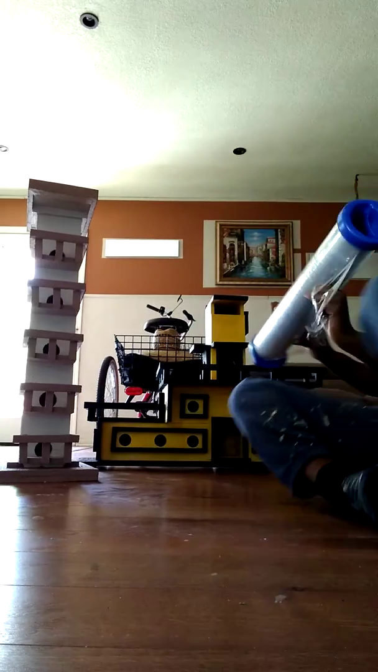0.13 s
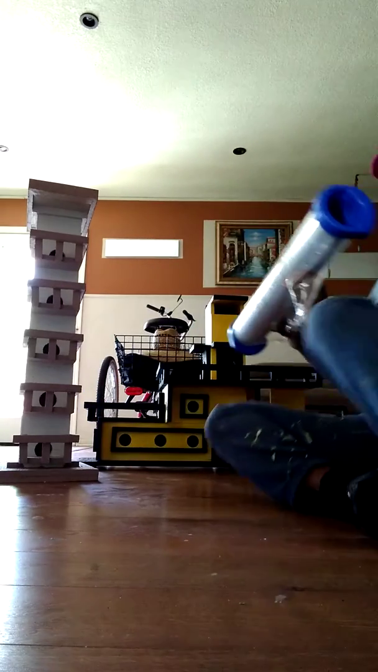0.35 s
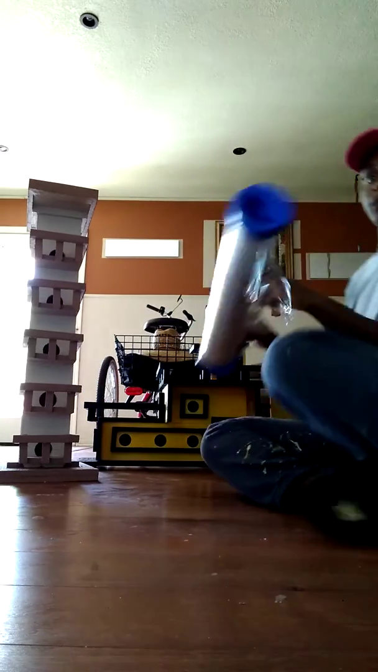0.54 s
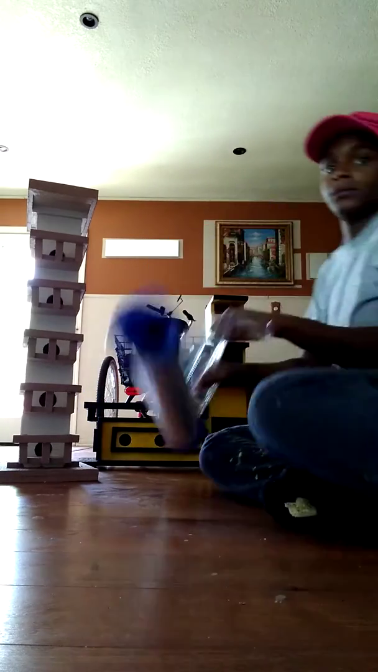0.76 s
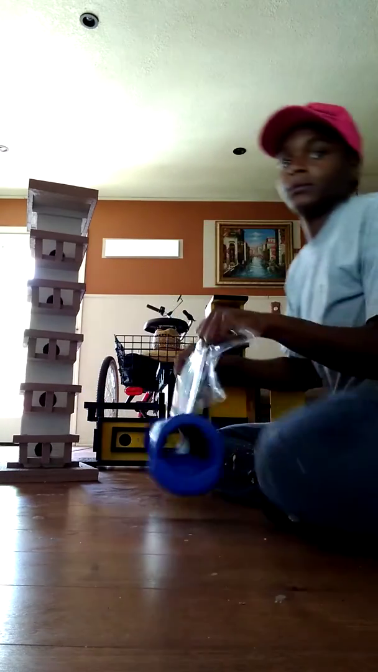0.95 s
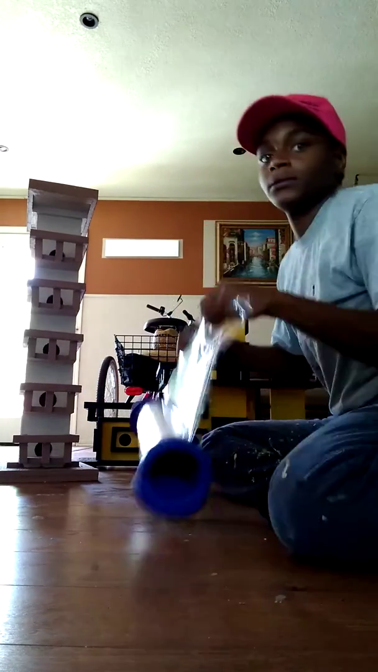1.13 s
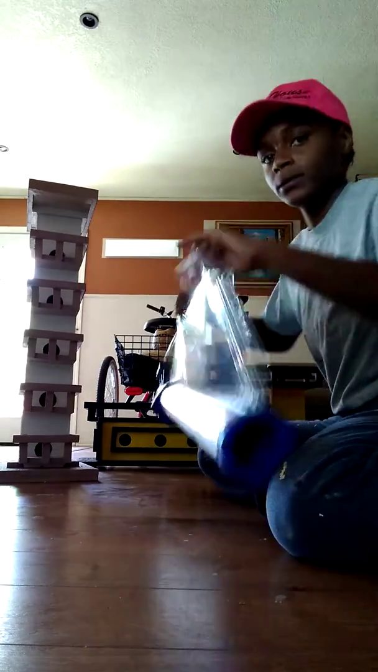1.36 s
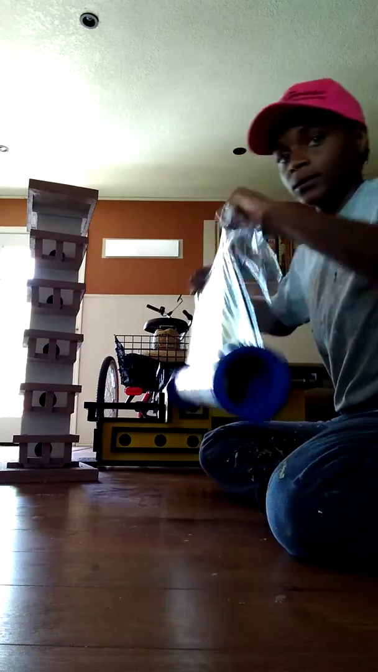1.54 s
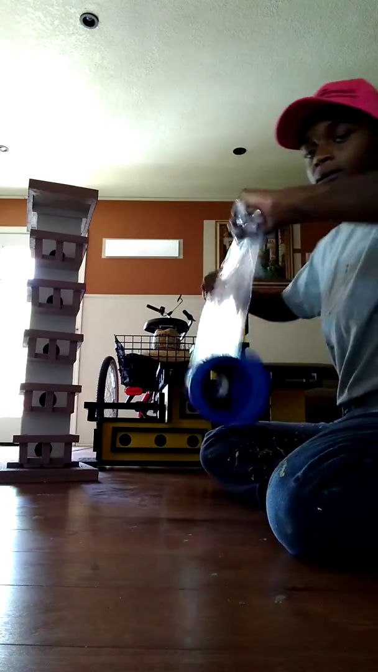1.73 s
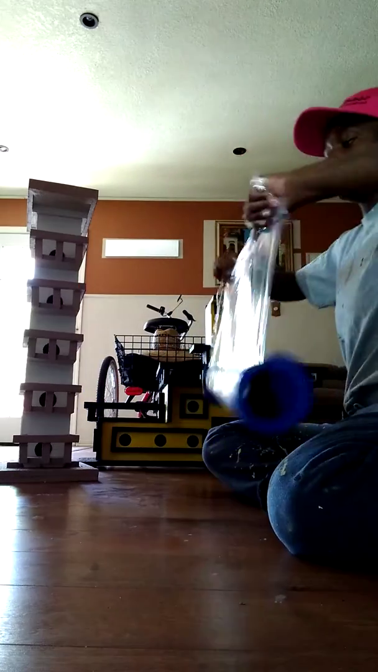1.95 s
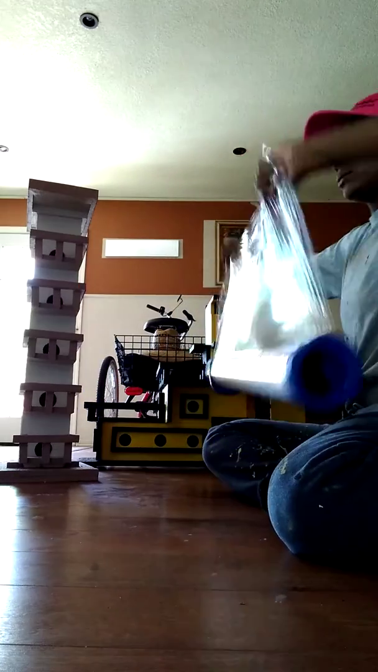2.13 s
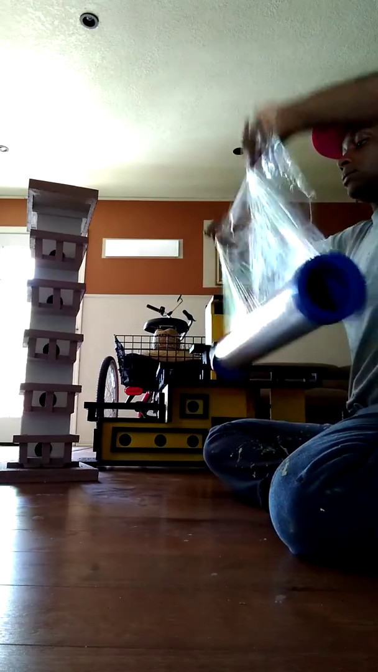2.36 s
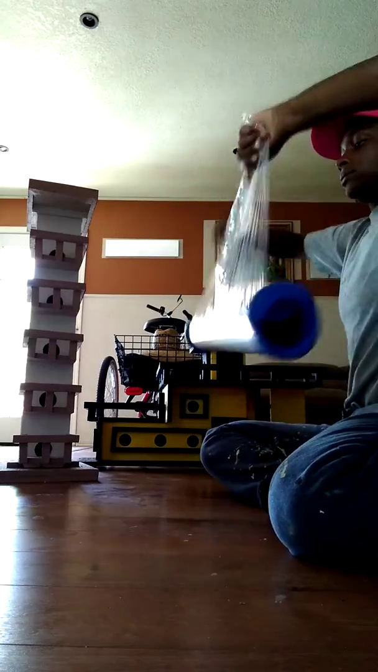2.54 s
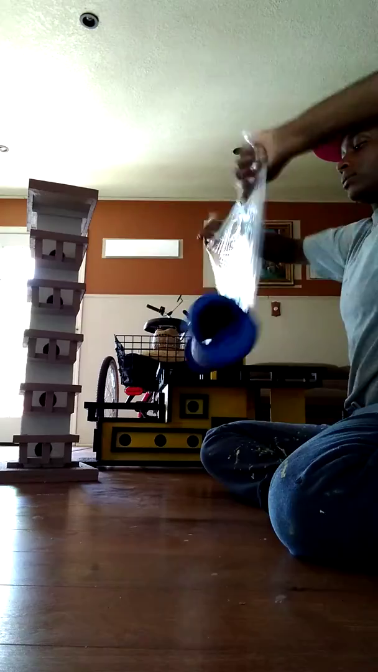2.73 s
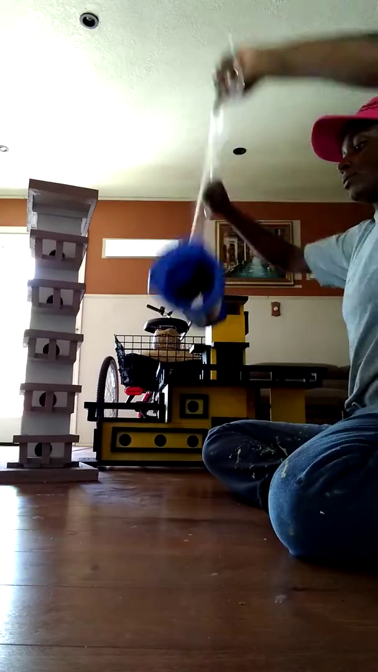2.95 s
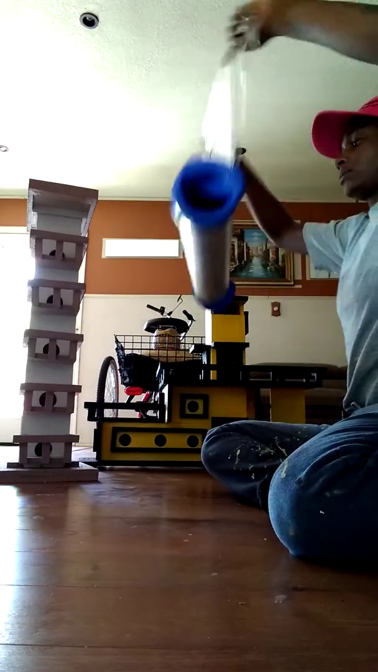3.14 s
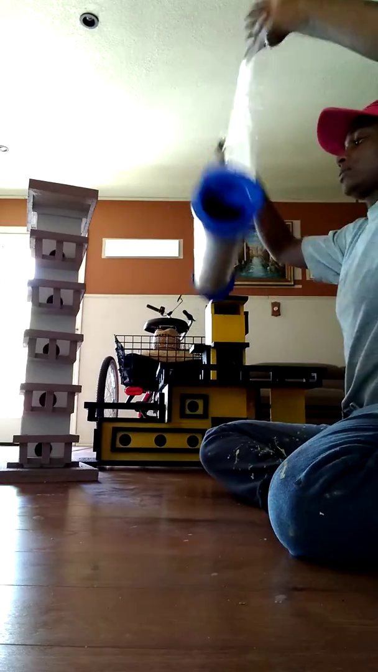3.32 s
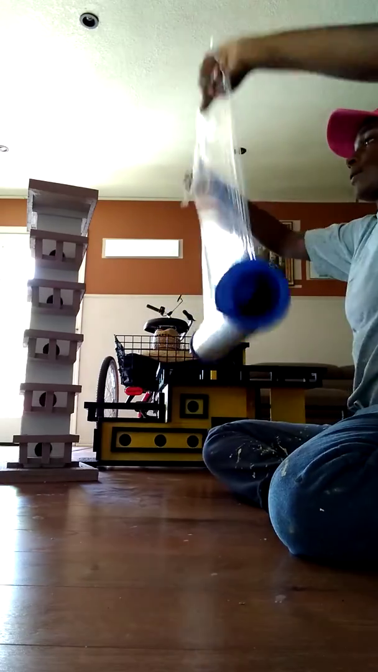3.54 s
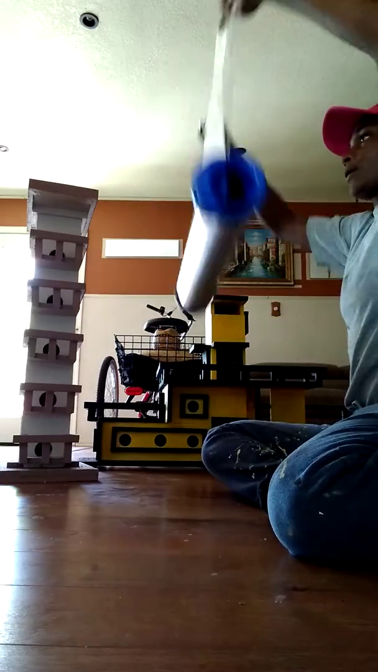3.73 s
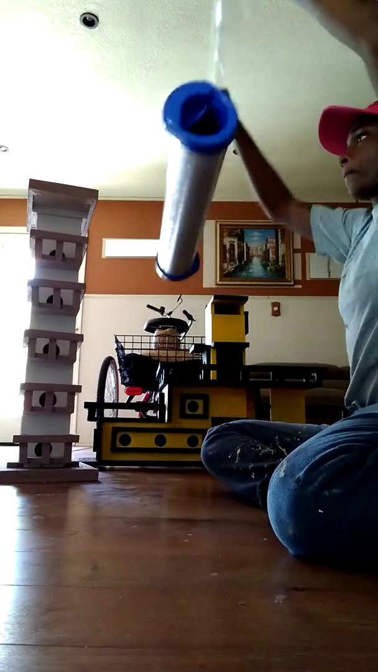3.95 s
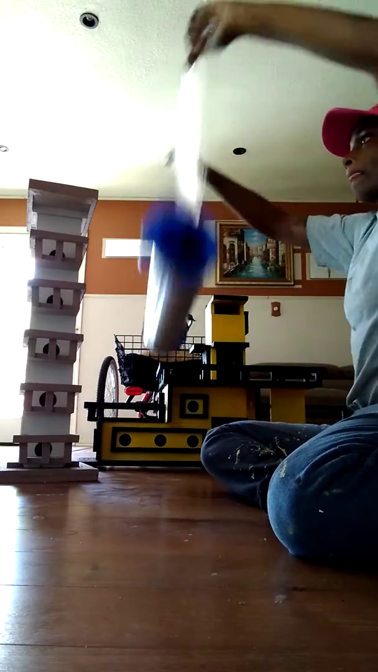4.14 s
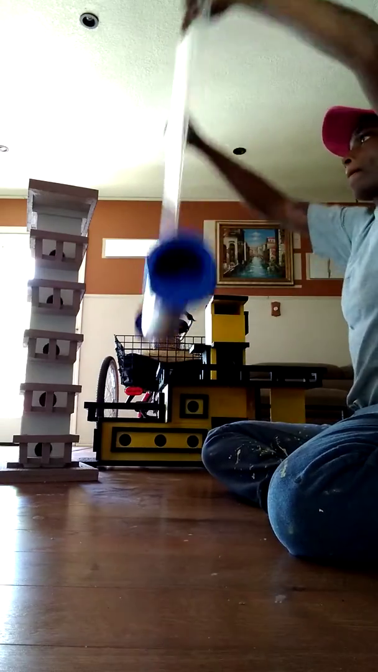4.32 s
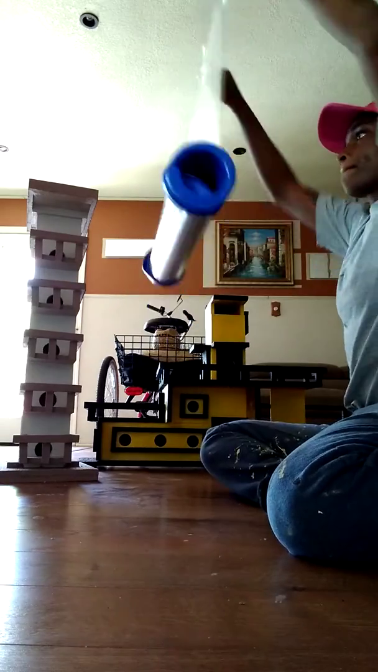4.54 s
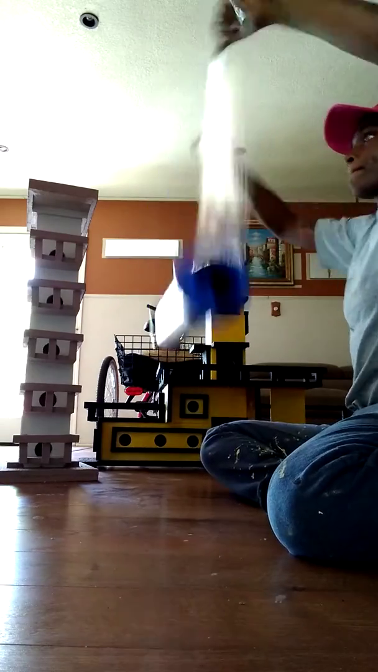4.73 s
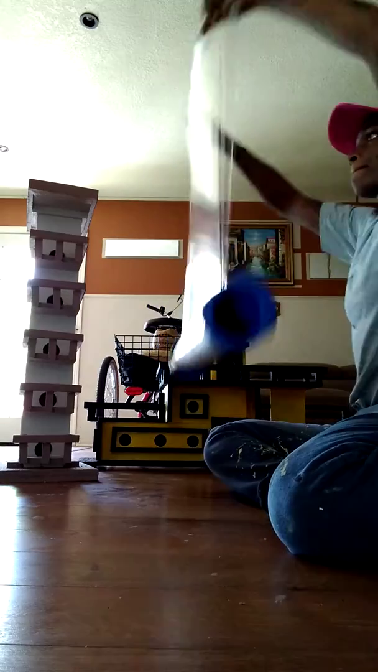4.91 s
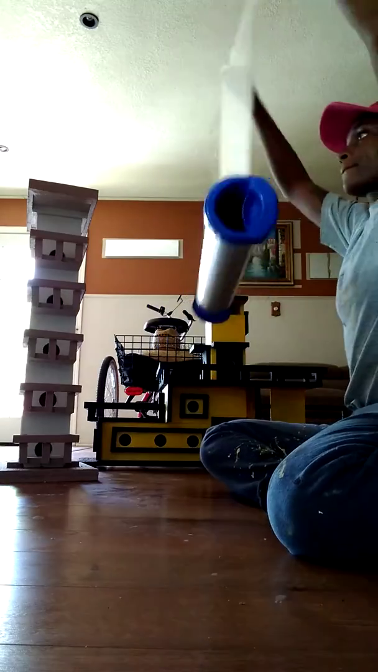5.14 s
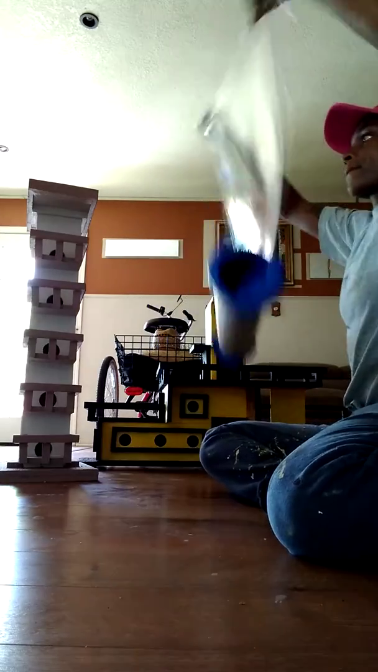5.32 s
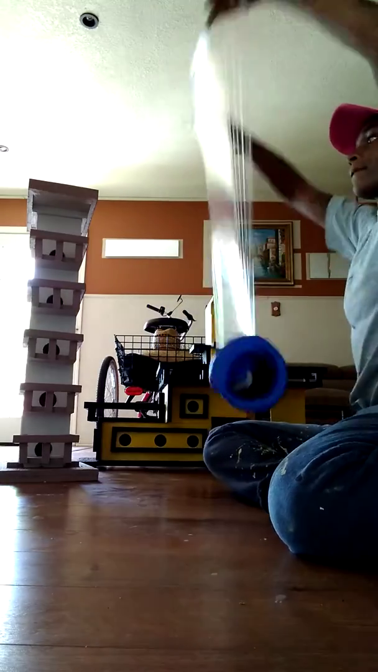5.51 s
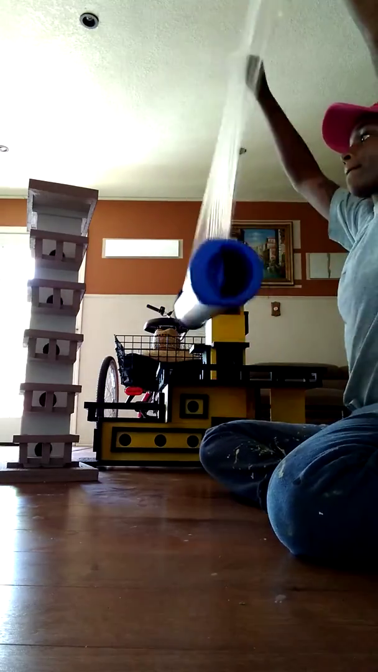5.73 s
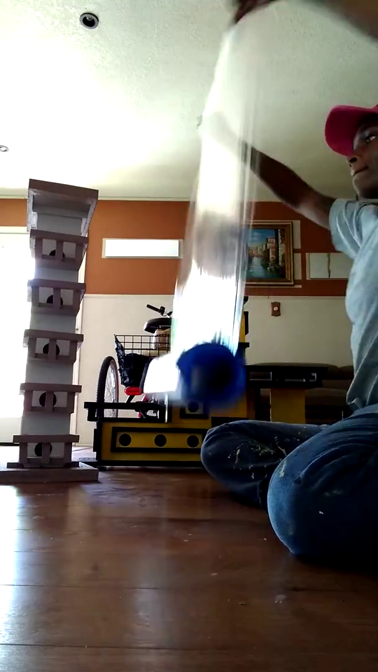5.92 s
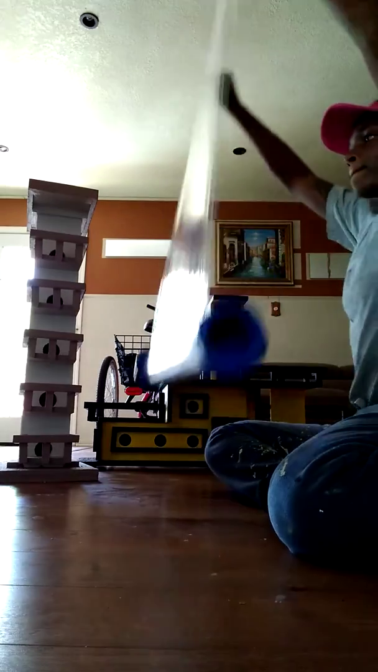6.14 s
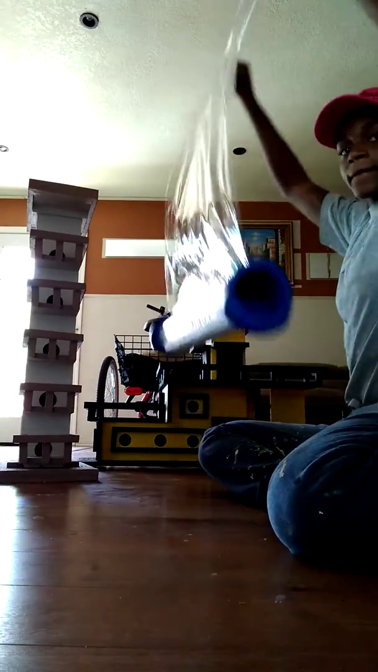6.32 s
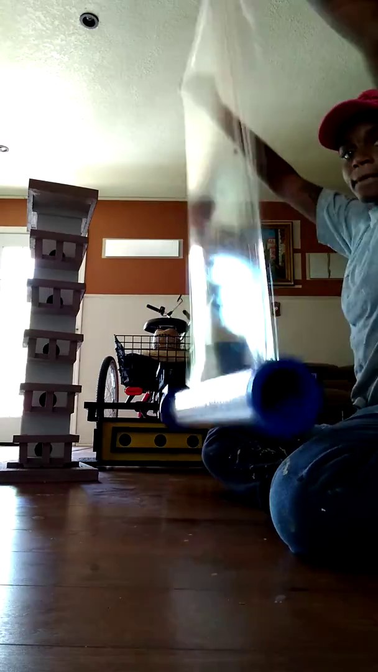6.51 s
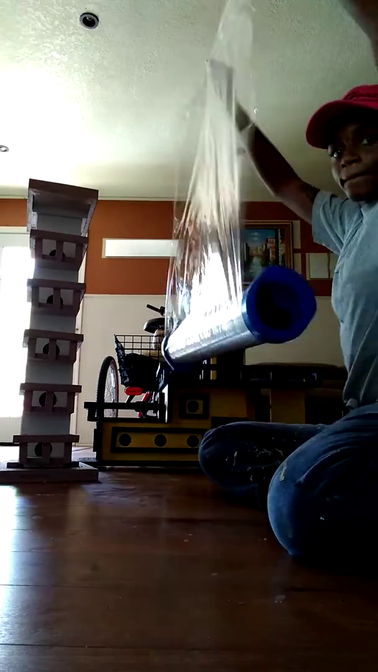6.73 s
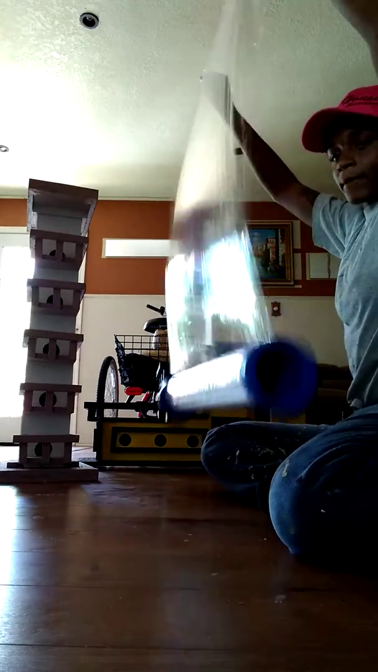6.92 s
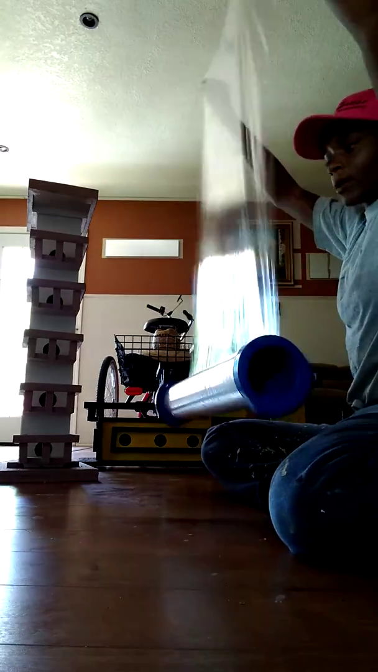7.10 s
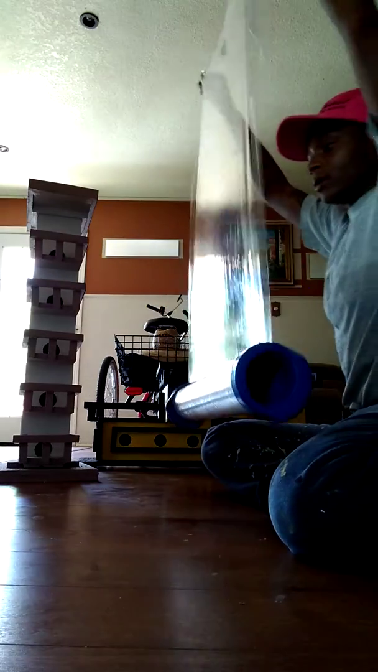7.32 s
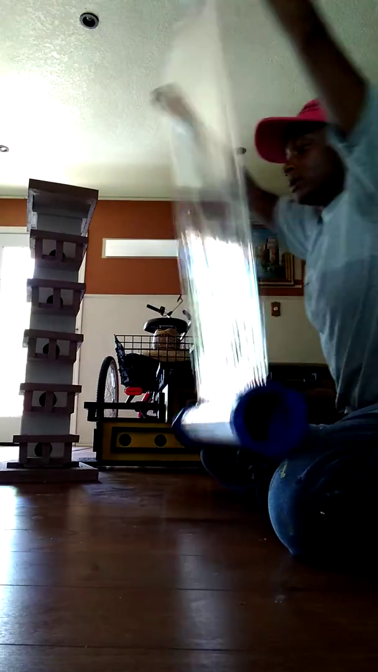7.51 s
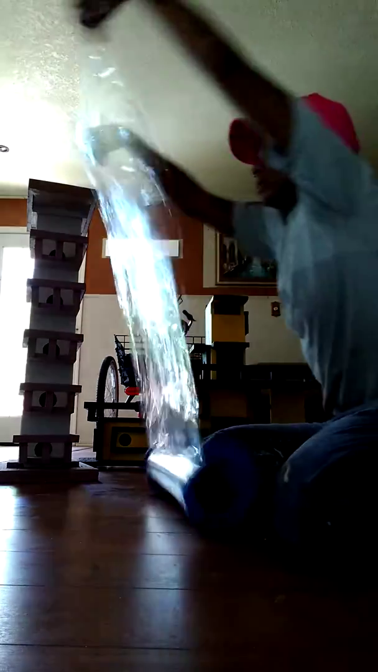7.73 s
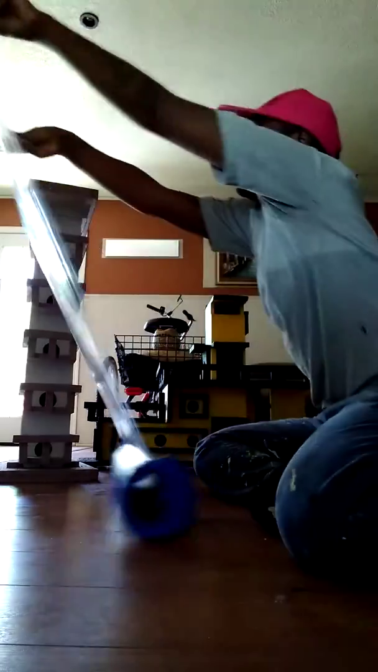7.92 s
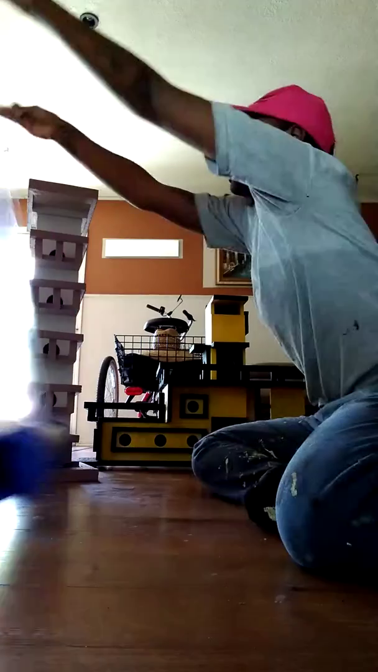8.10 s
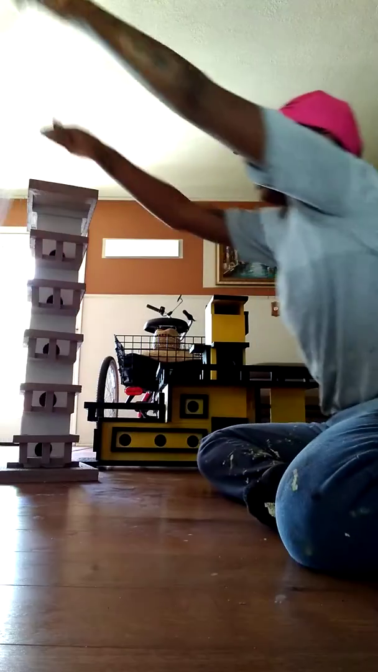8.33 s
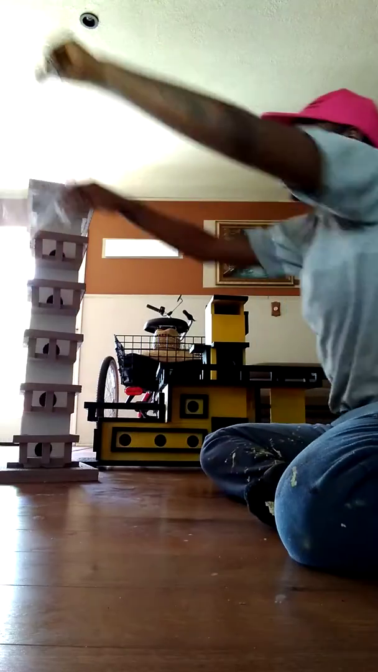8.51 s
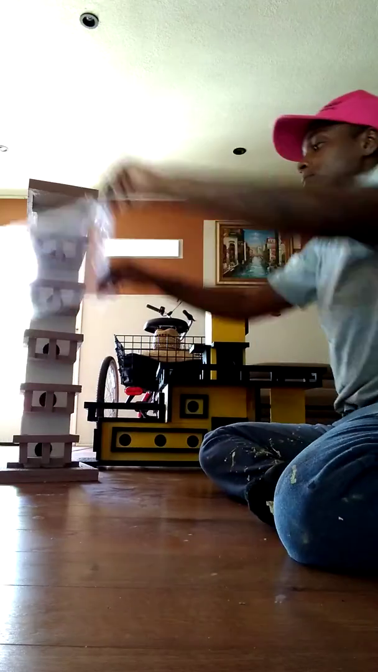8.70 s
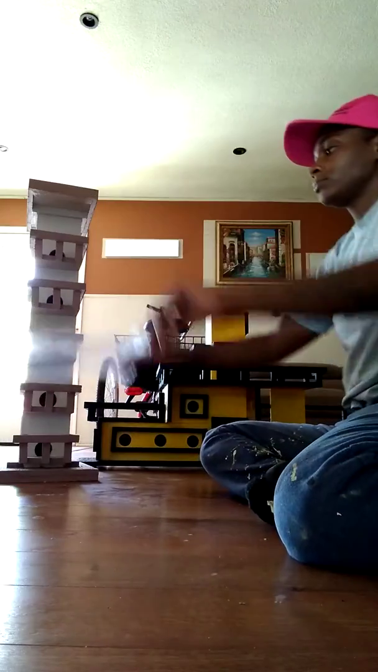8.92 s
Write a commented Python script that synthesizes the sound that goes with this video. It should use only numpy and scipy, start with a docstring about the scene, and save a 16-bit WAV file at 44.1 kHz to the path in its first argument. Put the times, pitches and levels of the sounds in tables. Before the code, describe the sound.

Plastic stretch wrap is pulled off a roll in short, uneven bursts that crackle and snap. Early on the roll gives a few hollow knocks, with a faint cloth scuff and one brief, bright rip. The tugs continue, more widely spaced, until the roll knocks loudly, then drops and clatters on the wooden floor. A phone on the floor picks it up in a bare, slightly echoing room.

```python
"""A house murmurs around a bare room with a wooden floor. Stretch wrap is tugged off a hanging roll in short
bursts: thousands of tiny slips drum on the taut sheet and crackle. Early on the roll knocks about, the
boards boom, a trouser leg scuffs, creases snap and two clinging layers rip apart. The tugs go on until,
near the end, the roll knocks hard, then drops and clatters. A phone on the floor hears it all through
two ports and a noise suppressor."""
import sys
import numpy as np
from scipy import signal
from scipy.fft import rfft, irfft
from scipy.io import wavfile

SR = 44100
rng = np.random.default_rng(int(sys.argv[2]) if len(sys.argv) > 2 else 0)


def put_to_file(sound):
    """Save the sound as 16-bit audio at rate SR, in the file named by the first command-line argument."""
    columns = np.atleast_2d(sound).T  # one column per channel
    safe = np.clip(columns, -1, 1)
    whole_steps = np.round(safe * 32767)
    wavfile.write(sys.argv[1], SR, whole_steps.astype(np.int16))


N = 399546


def undb(db):
    """Decibels to gain."""
    return 10 ** (np.asarray(db) / 20)


def unit(x):
    """Scale to unit energy."""
    return x / np.sqrt(np.sum(x ** 2))


def decay(t, t60_s):
    """Envelope that falls 60 dB in t60_s."""
    return np.exp(-np.log(1000) * t / t60_s)


def curve_at(table, hz):
    """Read a curve on a log-frequency axis."""
    freq_hz, value = np.transpose(table)
    return np.interp(np.log(hz + 1), np.log(freq_hz), value)


def tone(eq, size=1024):
    """Minimum-phase, unit-energy click coloured by an EQ curve."""
    cepstrum = irfft(np.log(undb(curve_at(eq, np.fft.rfftfreq(size, 1 / SR)))))
    cepstrum[1:size // 2] *= 2
    cepstrum[size // 2 + 1:] = 0
    return unit(irfft(np.exp(rfft(cepstrum))))


def convolve(x, impulse):
    """Filter and keep the scene's length."""
    return signal.fftconvolve(x, impulse)[:N]


def add(track, start_s, x):
    """Mix x into the track at start_s."""
    i = int(start_s * SR)
    track[i:i + len(x)] += x[:N - i]


def slips(per_s, spread_db):
    """Random train of tiny releases with uneven sizes, rms 1."""
    chance, size, sign = rng.random(N), rng.standard_normal(N), rng.choice([-1, 1], N)
    clicks = (chance < per_s / SR) * sign * undb(spread_db * np.clip(size, -2, 2))
    return unit(clicks) * np.sqrt(N)


# Dark room tone: freq_hz, gain_db
MURMUR_EQ = [(25, -25), (42, -12), (57, 13.5), (78, -0.5), (130, 4), (200, 11), (330, 4), (520, 5),
             (1000, 0.5), (2000, -11.5), (5000, -17), (15500, -25)]

def house_murmur(level_db=-57):
    """The house lays a steady bed of low noise under everything."""
    return undb(level_db) * convolve(rng.standard_normal(N), tone(MURMUR_EQ, size=8192))


# Tugs, each starting as the film lets go, with a creep before it: start_s, creep_s, fall_s, level_db
TUG_CUES = [(0.145, 0.0063, 0.083, -52.5), (.53, 0.051, 0.72, -50.5), (0.784, .062, 0.11, -35),
            (1.16, 0.064, 0.14, -40), (1.37, 0.0064, 0.065, -30), (1.534, 0, 0.068, -45),
            (1.722, 0.025, 0.048, -37.5), (1.896, 0.028, 0.058, -28.5), (2.149, 0, 0.052, -42),
            (2.24, 0, .16, -48), (2.356, 0.0025, 0.066, -43), (2.458, 0, 0.17, -42.5),
            (2.561, 0, 0.24, -48.5), (2.729, 0.0073, 0.24, -38.5), (2.907, 0, 0.031, -32),
            (3.376, 0.022, 0.085, -42.5), (3.491, 0.0066, 0.075, -43), (4.216, 0.0068, 0.065, -35),
            (4.802, 0.0058, 0.11, -30.5), (5.482, 0.11, .13, -36), (5.998, 0.029, 0.1, -33.5),
            (6.529, 0.039, 0.078, -32.5), (6.922, 0.076, 0.06, -41), (7.043, 0.021, 0.17, -44),
            (7.701, 0.081, 0.061, -46.5), (7.93, 0.043, 0.23, -41.5), (8.44, 0.058, 0.2, -50.5),
            (8.621, 0.0048, 0.16, -43.5)]
# The sheet crackles less when drawn taut, more when it hangs in wrinkles: time_s, crackle_db
WRINKLE_RIDE = [(2.8, 1.5), (3.5, -3.5), (6.5, -1), (7.0, 1.5)]
# Single creases snapping: start_s, relative_level_db
CREASE_CUES = [(.7278, -34.5), (.8159, -23), (1.3594, -23.5), (1.703, -40.5), (1.7333, -26), (1.912, -16.5),
               (2.921, -31), (3.777, -47), (4.4238, -40), (4.8254, -25), (5.1445, -43.5), (6.8468, -46),
               (6.884, -38.5), (7.0648, -34.5), (7.089, -34), (7.721, -37), (8.2355, -37.5),
               (8.3685, -43.5), (8.6333, -35.5)]
# Low body of the drumming sheet: freq_hz, gain_db
SHEET_EQ = [(30, -16), (70, -5.5), (150, -5), (320, 0), (600, -3), (1100, -3.5), (1600, -10.5),
            (2500, -15.5), (5000, -26.5), (16000, -55)]
# Crisp edge of the peel line: freq_hz, gain_db
PEEL_EQ = [(200, -11.5), (1000, -5.5), (2400, 2), (3500, -2.5), (5500, -8), (7000, -10), (9000, -10.5),
           (11500, -12.5), (15500, -16.5)]

def film_tugs(tighten_s=0.072, tighten_db=-24, creep_db=(-16, -10), rise_s=0.025, fall_db=-14,
              snap_after_s=0.011, release_db=-1, snap_s=0.0067, snap_boost_db=24, push_db=-9,
              pivot_db=-41, crackle_growth=0.71, crackle_db=-6, shared_slips=0.48):
    """The film tightens, creeps and lets go with a snap; slips drum the sheet, the peel line crackles."""
    t = np.arange(SR) / SR
    drum, crackle = np.zeros((2, N))
    snaps = list(CREASE_CUES)
    for start_s, creep_s, fall_s, level_db in TUG_CUES:
        # on harder tugs the crackle grows more slowly than the drumming
        crisp_db = pivot_db + crackle_growth * (level_db - pivot_db)
        crisp_db += np.interp(start_s, *np.transpose(WRINKLE_RIDE))
        crinkle = undb(crisp_db + tighten_db) * (t < tighten_s) * t / tighten_s
        add(crackle, max(start_s - tighten_s, 0), crinkle)
        # the film speeds up with the arm, then slows as the roll catches up
        since_s = t - creep_s
        speed = np.interp(since_s, [-creep_s - 1 / SR, 0, rise_s], [*undb(creep_db), 1])
        speed *= undb(fall_db * (np.maximum(since_s - rise_s, 0) / fall_s) ** 2)
        add(drum, start_s - creep_s, undb(level_db) * speed)
        add(crackle, start_s - creep_s, undb(crisp_db) * speed ** crackle_growth)
        snaps.append((start_s + snap_after_s, crisp_db + release_db))
    # fill both envelopes with slips
    sheet_slips, fine_slips = slips(per_s=2200, spread_db=2.5), slips(per_s=900, spread_db=2.5)
    drum *= sheet_slips
    crackle *= shared_slips * sheet_slips + fine_slips
    for start_s, level_db in snaps:
        # a crease gives way: one push on the sheet and a brief spray of noise
        spray = unit(rng.standard_normal(SR) * np.exp(-t / snap_s))
        add(drum, start_s, [undb(level_db + snap_boost_db + push_db)])
        add(crackle, start_s, spray * undb(level_db + snap_boost_db))
    return convolve(drum, tone(SHEET_EQ)) + undb(crackle_db) * convolve(crackle, tone(PEEL_EQ))


# Knocks of a knee on the floor and of the roll, and the roll's jerks, falls and bounces: start_s, level_db,
# pitch_hz, hardness_db, reverb_send_db
KNOCK_CUES = [(0.1396, -17, 523, -20, -5), (0.1744, -18, 530, -18, -13.5), (0.511, -30.5, 440, -23, -1),
              (0.9846, -13, 529, -9, -3.5), (1.358, -22.5, 670, -14, -6),
              (1.5684, -16.5, 630, -16.5, -16.5), (4.231, -28, 284, -32, 8.5),
              (4.8119, -23, 316, -17.5, 7.5), (7.7832, -6, 658, -8.5, -5), (7.8114, -1.5, 613, -10.5, -2),
              (7.857, -10.5, 580, -36, -1), (7.908, -13.5, 632, -32, 4), (8.5363, -5, 430, -9, -3.5),
              (8.562, -9, 503, -26, 1), (8.6448, -10, 417, -12, -3.5), (8.718, -9, 483, -18.5, -4.5),
              (8.7551, -13, 322, -16.5, -9), (8.787, -14, 480, -20, -28)]
# Ring of the roll and its hollow core: pitch_hz, level_db, t60_s
ROLL_MODES = [(267.5, -0.5, 0.55), (393, -2.5, 0.089), (462, -16, 0.6), (521.4, -2.5, 0.19),
              (588, -15, 0.59), (670, 7, 0.054), (1000, -14.5, 0.14), (1118, -12, 0.041),
              (1250, -13.5, 0.26), (1543, -2.5, 0.065), (1712, -18.5, 0.12), (1910, -2, 0.041),
              (2800, -29.5, .15), (5080, -18, 0.043)]
# Hard clack of the end cap: freq_hz, gain_db
CAP_EQ = [(40, -36.5), (150, -15.5), (400, -21.5), (1000, 6), (1500, -4), (2000, -2), (3500, -11),
          (4200, -20.5), (5200, -19.5), (6500, -26.5), (8000, -28.5), (15500, -38.5)]

def roll_knocks(attack_s=0.00021, thud_t60_s=0.039, t60_doubling_db=12,
                held_ring_db=-32.5, free_ring_db=-23, let_go_s=8.4,
                rattle_s=0.0029, rattle_gain=0.93, clack_db=20,
                crack_hz=5100, crack_t60_s=0.006, crack_db=-5.5, low_cut_hz=130):
    """Blows thud at the struck spot's pitch, clack the cap and ring the roll; gives (direct, send)."""
    t = np.arange(SR) / SR
    direct, send = np.zeros((2, N))
    attack, cap = 1 - np.exp(-t / attack_s), tone(CAP_EQ)
    modes = np.array([undb(db) * np.exp(2j * np.pi * hz * t) * decay(t, t60_s)
                      for hz, db, t60_s in ROLL_MODES])
    for start_s, level_db, pitch_hz, hardness_db, send_db in KNOCK_CUES:
        t60_s = thud_t60_s * 2 ** (level_db / t60_doubling_db)  # heavier blows thud for longer
        thud = -np.sin(2 * np.pi * pitch_hz * t) * decay(t, t60_s)
        ring_db = held_ring_db if start_s < let_go_s else free_ring_db  # damped while held
        phases = np.exp(2j * np.pi * rng.random(len(modes)))
        ring = undb(ring_db) * np.imag(phases @ modes)
        contact = rattle_gain * unit(rng.standard_normal(SR) * np.exp(-t / rattle_s))
        contact[0] -= 1  # the hit itself, ahead of its rattle
        clack = undb(hardness_db + clack_db) * convolve(contact, cap)[:SR]
        blow = undb(level_db) * (attack * (thud + ring) + clack)
        # the end cap cracks at the instant of contact
        crack = np.sin(2 * np.pi * crack_hz * t) * decay(t, crack_t60_s)
        add(direct, start_s, blow + undb(level_db + hardness_db + crack_db) * crack)
        add(send, start_s, undb(send_db) * blow)
    # the slim roll radiates little bass
    return signal.sosfilt(signal.butter(2, low_cut_hz, "high", fs=SR, output="sos"), [direct, send])


# Soft bumps of a knee and of the roll: start_s, level_db, pitch_hz
BUMP_CUES = [(0.173, -35.5, 118), (0.514, -37, 200), (.985, -32.5, 211), (1.386, -39, 85)]

def floor_booms(t60_s=0.057):
    """The floorboards answer each bump with a short, low boom."""
    t = np.arange(SR) / SR
    booms = np.zeros(N)
    for start_s, level_db, pitch_hz in BUMP_CUES:
        add(booms, start_s, undb(level_db) * np.sin(2 * np.pi * pitch_hz * t) * decay(t, t60_s))
    return booms


# Cloth on wood: freq_hz, gain_db
CLOTH_EQ = [(100, -12), (250, -13), (600, -8), (1000, -5), (1550, 1), (2100, -14), (4000, -13),
            (15000, -28)]

def trouser_scuff(start_s=0.5, length_s=0.19, level_db=-50):
    """Fibres catch and slip as a trouser leg slides across the boards."""
    progress = np.clip((np.arange(N) / SR - start_s) / length_s, 0, 1)
    slide = undb(level_db) * np.sqrt(np.maximum(np.sin(np.pi * progress), 0))
    return convolve(slide * slips(per_s=4000, spread_db=3), tone(CLOTH_EQ))


# Thin, bright rip, on too short a span to drum: freq_hz, gain_db
RIP_EQ = [(1500, -32), (2400, -4.5), (3050, 3), (3900, 6.5), (5000, -3), (7500, -2), (10000, -6.5),
          (15500, -11.5)]

def layer_rip(start_s=1.262, length_s=0.04, end_db=-26.5, swell_db=13):
    """Two clinging layers part in a fast run of slips that swells, then stops dead."""
    progress = (np.arange(N) / SR - start_s) / length_s
    gate = (progress > 0) * (progress < 1)
    swell = undb(end_db - swell_db * (1 - np.clip(progress, 0, 1)))
    return convolve(gate * swell * slips(per_s=2500, spread_db=11), tone(RIP_EQ))


# Decay of the bare room: freq_hz, t60_s
ROOM_DECAY = [(60, 0.73), (250, 0.56), (600, 0.61), (1200, 0.69), (3000, 0.59), (7000, 0.45), (16000, 0.39)]

def room_tail(far_swell, far_s, far_width_s, build_s=0.00062, spread_db=4):
    """Uneven early echoes, a swell from the far walls, then a wash whose treble dies first."""
    t = np.arange(SR) / SR
    shape = 1 - np.exp(-t / build_s) + far_swell * np.exp(-((t - far_s) / far_width_s) ** 2)
    echoes = rng.standard_normal(SR) * undb(spread_db * rng.standard_normal(SR)) * shape
    hz, time_s, bands = signal.stft(echoes, SR, nperseg=256)
    bands *= decay(time_s, curve_at(ROOM_DECAY, hz)[:, None])
    return unit(signal.istft(bands, SR)[1])


def shifting_reverb(x, rate_hz=3.1):
    """Two tails crossfade: the echo pattern keeps changing as the roll swings and the arms move."""
    angle = 2 * np.pi * rate_hz * np.arange(N) / SR
    return sum(convolve(x * fade(angle), room_tail(far_swell=0.061, far_s=0.038, far_width_s=0.19))
               for fade in (np.cos, np.sin))


# Phase by which the left port trails the right: freq_hz, lag_half_turns
PORT_LAG = [(0, 0), (600, -.08), (1300, .04), (2200, 1), (3300, 2), (4480, 3), (6650, 5), (8780, 7),
            (10700, 9), (16000, 14.1)]
# Stereo width of the diffuse sound: freq_hz, side_db
PORT_WIDTH = [(30, -6), (70, -5), (130, -6), (300, -8), (600, -9), (1200, -6.5), (4000, -4.5), (8000, -5),
              (13000, -1)]

def phone_ports(mid, side):
    """Two spaced ports: one trails the other, and they hear the diffuse sound differently."""
    hz = np.fft.rfftfreq(N, 1 / SR)
    mid_bins, side_bins = rfft(mid), rfft(side) * undb(curve_at(PORT_WIDTH, hz))
    lag = np.exp(-1j * np.pi * np.interp(hz, *np.transpose(PORT_LAG)))
    return irfft([(mid_bins + side_bins) * lag, mid_bins - side_bins], N)


def noise_suppressor(x, threshold_db=-48, floor_db=-11, steepness=3.02, follow_s=0.0038, bass_hz=110):
    """A soft gate, linked across both channels, turns down faint sound above the bass."""
    bass = signal.sosfiltfilt(signal.butter(2, bass_hz, fs=SR, output="sos"), x)
    upper = x - bass
    pole = np.exp(-1 / (follow_s * SR))
    rms = np.sqrt(signal.lfilter([1 - pole], [1, -pole], np.mean(upper ** 2, axis=0)))
    opening = (rms / undb(threshold_db)) ** steepness
    return bass + upper * (undb(floor_db) + opening) / (1 + opening)


def scene(film_direct_db=-2, film_send_db=-7.5, floor_send_db=-3):
    """Film, roll and floor reach the ports over their reverb and the murmur of the house."""
    film = film_tugs() + layer_rip()
    floor = floor_booms() + trouser_scuff()
    knocks, knock_send = roll_knocks()
    diffuse = []
    for _ in ("mid", "side"):
        film_reverb = shifting_reverb(undb(film_send_db) * film)
        # blows at floor level come back strongly from the far walls
        slap = room_tail(far_swell=0.48, far_s=0.15, far_width_s=0.043)
        floor_reverb = convolve(knock_send + undb(floor_send_db) * floor, slap)
        diffuse.append(film_reverb + floor_reverb + house_murmur())
    direct = undb(film_direct_db) * film + knocks + floor
    return phone_ports(mid=direct + diffuse[0], side=diffuse[1])


def record(dry, low_cut_hz=45, high_cut_hz=15700):
    """The phone's chain: rumble cut, noise suppressor, clipping at full scale, steep top cut."""
    low_cut = signal.butter(3, low_cut_hz, "high", fs=SR, output="sos")
    high_cut = signal.ellip(10, 0.2, 70, high_cut_hz, fs=SR, output="sos")
    gated = noise_suppressor(signal.sosfilt(low_cut, dry))
    return signal.sosfilt(high_cut, np.clip(gated, -1, 1))


dry = scene()
out = record(dry)
put_to_file(out)
```